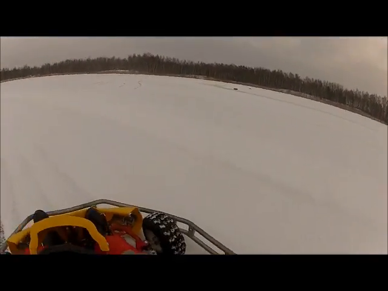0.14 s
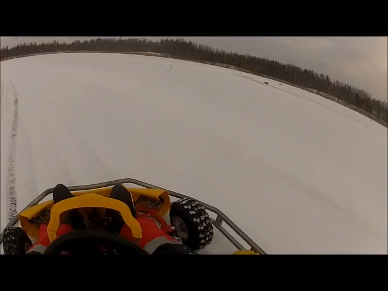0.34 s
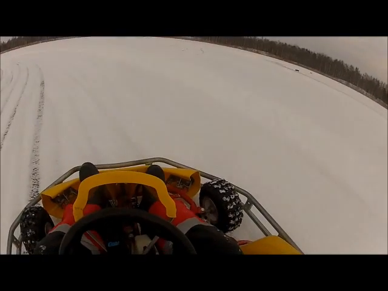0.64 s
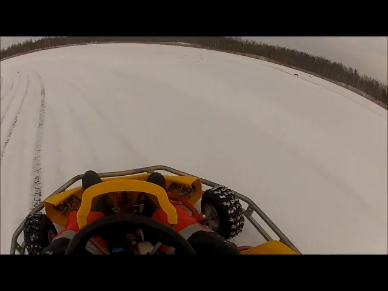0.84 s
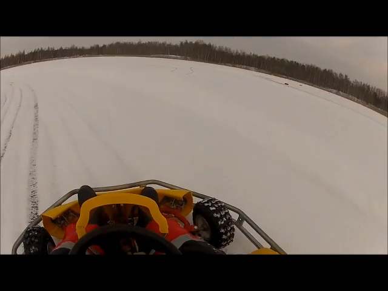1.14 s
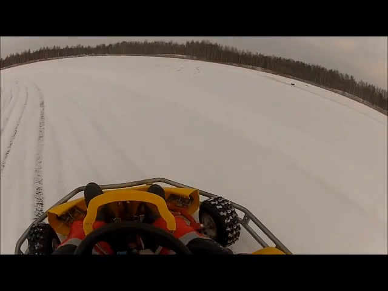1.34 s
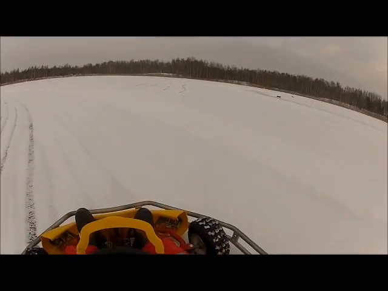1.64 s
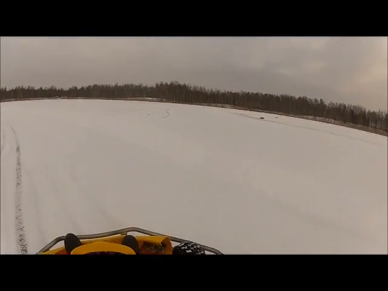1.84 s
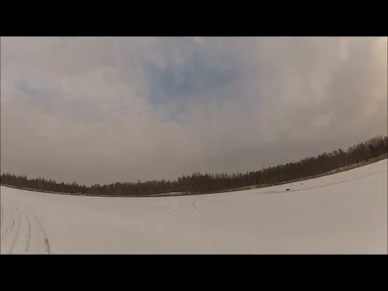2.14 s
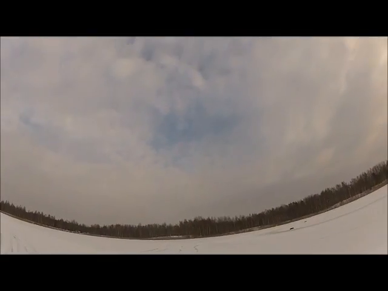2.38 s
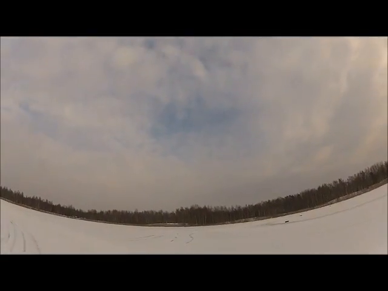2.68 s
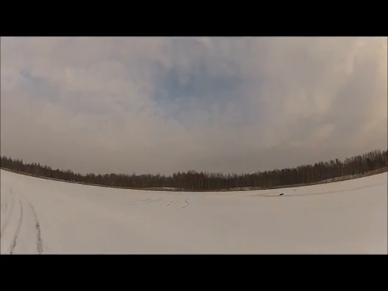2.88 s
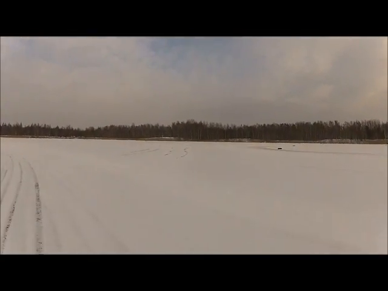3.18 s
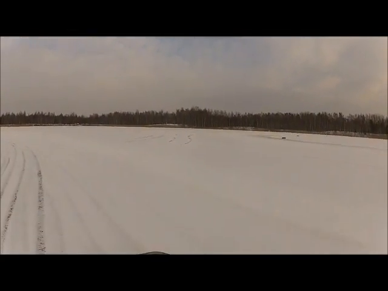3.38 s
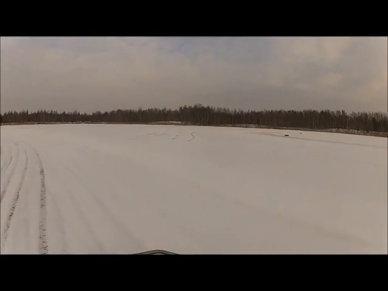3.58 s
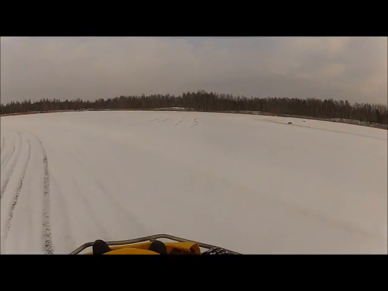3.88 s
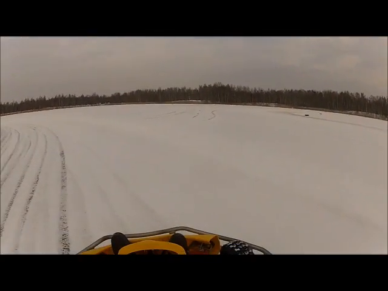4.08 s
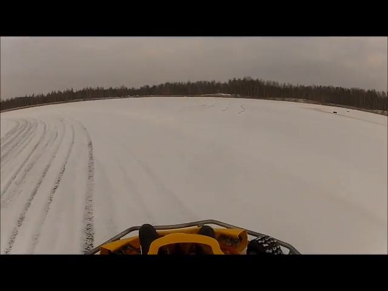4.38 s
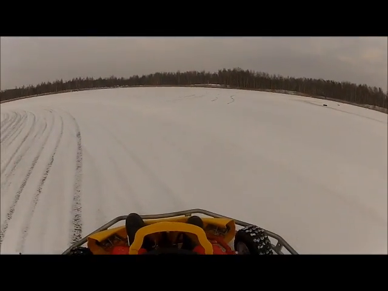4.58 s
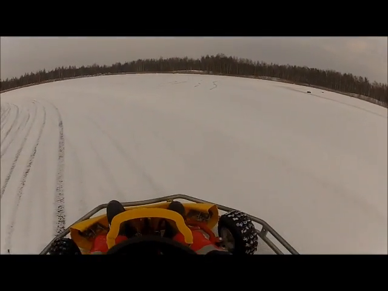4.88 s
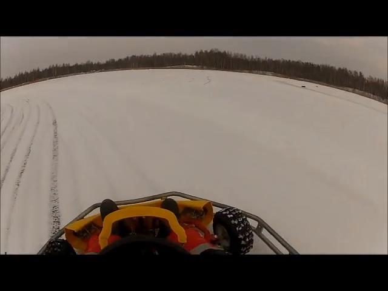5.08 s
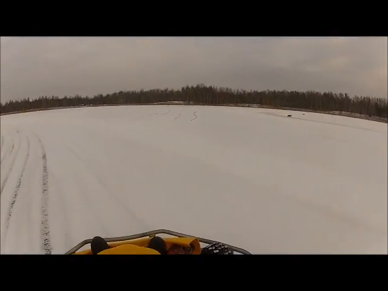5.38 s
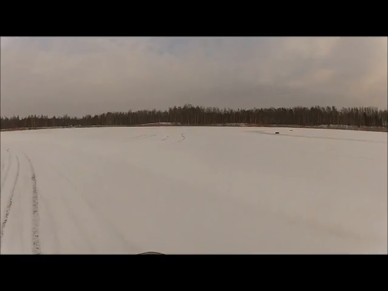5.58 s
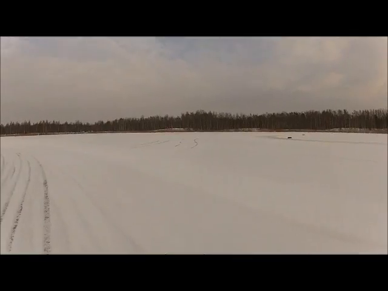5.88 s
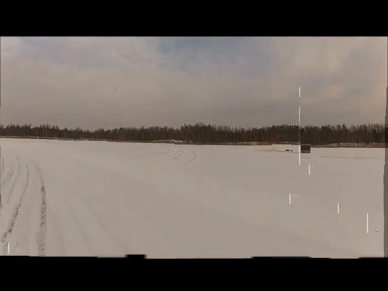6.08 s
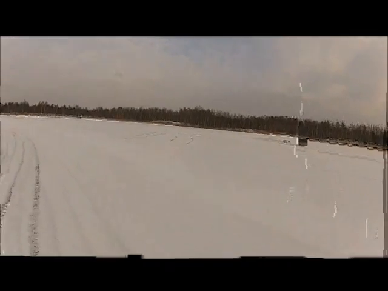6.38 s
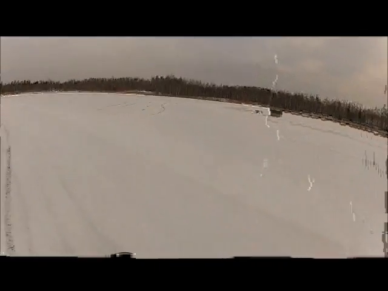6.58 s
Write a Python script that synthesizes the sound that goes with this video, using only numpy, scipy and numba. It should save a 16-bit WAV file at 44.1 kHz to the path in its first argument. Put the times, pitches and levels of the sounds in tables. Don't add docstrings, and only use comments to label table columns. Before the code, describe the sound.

A kart rolls over a frozen lake, played back slowed and muffled. The beginning is nearly still, with murmuring rumble, dull hiss and a few plastic scrapes. After two seconds deep thuds arrive unevenly, with a short slowing chatter of a loose part. From four seconds the blows are strong and crowded, with hard ticks and faint metallic pings, very close to the microphone.

```python
import sys
import numpy as np
from scipy import signal
from scipy.fft import rfft, irfft
from scipy.io import wavfile
from scipy.ndimage import uniform_filter1d
from numba import njit

SR = 44100
rng = np.random.default_rng(int(sys.argv[2]) if len(sys.argv) > 2 else 0)


def generate_wav(signal):
    frames = np.transpose(np.atleast_2d(signal))
    scaled = np.clip(frames, -1, 1) * 32767
    pcm = np.round(scaled).astype(np.int16)
    wavfile.write(sys.argv[1], SR, pcm)


def gain_from_decibels(decibels):
    exponent = np.asarray(decibels, float) / 20
    return 10 ** exponent


N = 296789


def level(x):
    return x / np.sqrt(np.mean(x ** 2))


def resonate(x, modes):
    out = 0
    for k, (hz, width_hz, db) in enumerate(modes):
        b, a = signal.iirpeak(hz, hz / width_hz / 1.5, SR)
        once = signal.lfilter(b, a, x)
        out = out + (-1) ** k * gain_from_decibels(db) * signal.lfilter(b, a, once)
    return out


def walk(rate_hz):
    hold = int(SR / rate_hz)
    steps = np.repeat(rng.standard_normal(400), hold)[:N]
    return 1.3 * uniform_filter1d(uniform_filter1d(steps, hold), hold)


def crackle(rate_hz, spread_db, tail_s):
    size_db = spread_db * np.minimum(rng.exponential(size=N), 2.6)
    grains = (rng.random(N) < rate_hz / SR) * gain_from_decibels(size_db)
    return level(signal.lfilter([1], [1, -np.exp(-1 / (tail_s * SR))], grains))


# frequency in Hz, level in dB per Hz.
MURMUR_COLOUR = [(35, -43.5), (60, 0), (138, -7), (206, -14), (351, -29), (524, -36), (800, -39),
                 (1040, -66)]


def rumble(ruts_db, hiss_db):
    hz = np.fft.rfftfreq(N, 1 / SR)
    points = np.array(MURMUR_COLOUR)
    colour = gain_from_decibels(np.interp(np.log(hz + 1), np.log(points[:, 0]), points[:, 1]))
    murmur = level(irfft(rfft(rng.standard_normal(N)) * colour, N))
    sway = level(resonate(rng.standard_normal(N), [(41, 14, -11.2), (33, 12, -16)]))
    drone = level(resonate(rng.standard_normal(N), [(230, 190, 0), (545, 300, -11.5)]))
    sway_db = -41 + .4 * (ruts_db + 40)
    drone_db = hiss_db - 4
    return (gain_from_decibels(sway_db + 1.5 * walk(8)) * sway
            + gain_from_decibels(ruts_db + 2.5 * walk(20)) * murmur
            + gain_from_decibels(drone_db + 2.2 * walk(18)) * drone)


def hiss(hiss_db):
    grain, fine = crackle(60, 3.0, .005), crackle(500, 3.0, .0015)
    flicker_db = .9 * walk(12)
    bright_db = hiss_db - 12
    low = gain_from_decibels(hiss_db + flicker_db + 1.1 * walk(25)) * (.6 + .12 * grain + .45 * fine)
    high = gain_from_decibels(bright_db + flicker_db + 1.6 * walk(25)) * (.45 + .2 * grain + .45 * fine)
    top = gain_from_decibels(bright_db - 14.5 + flicker_db) * (.5 + .6 * grain)
    return low, high, top


# start in seconds, length in seconds, level in dB,
# brightness in dB.
SCRAPES = [(0.0, .1, -44, -14), (0.45, .28, -39.5, -12), (1.38, .08, -42, -15), (1.73, .12, -37, -10),
           (2.28, .05, -41, -12), (2.352, .035, -40, -9), (3.06, .1, -41, -14), (3.385, .08, -38, -10),
           (3.55, .045, -37, -22), (3.81, .055, -38, -22), (4.035, .06, -37, -10), (4.12, .07, -38, -16),
           (4.565, .05, -37, -8), (4.625, .045, -31, -9), (4.895, .03, -41, -13), (5.29, .08, -41, -13),
           (5.44, .04, -39, -24), (5.655, .06, -45, -16), (5.81, .065, -37, -12), (6.11, .14, -41, -15),
           (6.3, .17, -38, -13), (6.62, .08, -46, -16)]


def scrapes():
    low, high, top, t = np.zeros(N), np.zeros(N), np.zeros(N), np.arange(N) / SR
    grit = .35 + .85 * crackle(260, 2.5, .0025)
    bright_grit = .4 * grit + .6 * grit[::-1]
    for s, length_s, db, bright_db in SCRAPES:
        swell = np.interp(t, [s, s + .25 * length_s, s + 1.3 * length_s], [0, 1, 0])
        burst = gain_from_decibels(db) * swell * grit
        low = np.hypot(low, burst)
        bright_burst = burst * bright_grit
        high = np.hypot(high, bright_burst * gain_from_decibels(bright_db))
        top = np.hypot(top, bright_burst * gain_from_decibels(bright_db - 8))
    return low, high, top


# start in seconds, peak level in dB, brightness in dB.
TICKS = [(0.4828, -27, -15), (0.5367, -25, -16), (0.5495, -23, -15), (0.6065, -27, -17), (1.7674, -23, -15),
         (1.8277, -28, -10), (2.0105, -19, -23), (2.2232, -21, -28), (2.8115, -18, -30), (3.0525, -31, -20),
         (3.1108, -22, -21), (3.4116, -26, -12), (3.757, -29, -16), (3.8033, -32, -28), (4.0148, -27, -11),
         (4.118, -12, -26), (4.2014, -22, -17), (4.2637, -32, -22), (4.5835, -28, -12), (4.7012, -26, -25),
         (4.7391, -23, -29), (4.9387, -22, -23), (5.1735, -24, -23), (5.3765, -12, -22), (5.5009, -26, -24),
         (5.5273, -20, -24), (5.5428, -14, -27), (6.3066, -30, -12), (6.3629, -28, -13), (6.3964, -19, -15)]


def ticks():
    low, high, t = np.zeros(N), np.zeros(N), np.arange(N) / SR
    for s, db, bright_db in TICKS:
        age = np.clip(t - s, 0, None)
        burst = (1 - np.exp(-age / .0004)) * gain_from_decibels(db - 60 * age / .045)
        low = np.hypot(low, burst * gain_from_decibels(-3.5))
        high = np.hypot(high, burst * gain_from_decibels(bright_db + 1.5))
    return low, high


# frequency in Hz, width in Hz, level in dB.
HOUSING_LOW = [(945, 190, -7), (1140, 70, 0), (1300, 160, 0.5), (1750, 180, -2.5), (2050, 200, -9.5),
               (2350, 300, -13.5)]
# frequency in Hz, width in Hz, level in dB.
HOUSING_HIGH = [(2800, 300, -2.5), (3200, 250, -7), (3560, 300, 0.4), (4250, 400, -13.5), (5000, 500, -14)]
# frequency in Hz, width in Hz, level in dB.
HOUSING_TOP = [(4250, 450, 0), (5100, 900, -2)]


def rattle(hiss_db):
    hiss_low, hiss_high, hiss_top = hiss(hiss_db)
    scrape_low, scrape_high, scrape_top = scrapes()
    tick_low, tick_high = ticks()
    low = np.hypot(np.hypot(tick_low, scrape_low), hiss_low)
    high = np.hypot(np.hypot(tick_high, scrape_high), hiss_high)
    top = np.hypot(scrape_top, hiss_top)

    noise, dust = rng.standard_normal((2, N))
    snap = np.zeros(N)
    snap[[int(s * SR) + 30 for s, db, bright_db in TICKS]] = gain_from_decibels(13)
    noise = noise + snap

    out = 0
    for loudness, source, modes in ((low, noise, HOUSING_LOW), (high, noise, HOUSING_HIGH),
                                    (top, dust, HOUSING_TOP)):
        out = out + resonate(loudness * source, modes) / np.std(resonate(source, modes))
    return out


# frequency in Hz, width in Hz, level in dB.
CHATTER_RING = [(3220, 170, 0), (4250, 200, -4)]


def chatter():
    t, taps = np.arange(N) / SR, np.arange(9)
    gaps_s = .0665 * 1.035 ** taps
    starts = 2.294 + np.cumsum(gaps_s) - gaps_s
    taps_db = -45 - 1.0 * taps + 2.5 * np.cos(2.1 * taps - 2.1)
    loudness = 0
    for s, db in zip(starts, taps_db):
        loudness = loudness + (t > s) * gain_from_decibels(db - 60 * np.abs(t - s) / .11)
    noise = rng.standard_normal(N)
    return resonate(loudness * noise, CHATTER_RING) / np.std(resonate(noise, CHATTER_RING))


# start in seconds, mount ring in dB, sway in dB, knock in dB, shell in dB.
KNOCKS = [(0.607, -38, -35, -37, -42), (1.767, -32, -36, -33, -36), (2.014, -29, -33, -25, -23),
          (2.244, -29, -30, -38, -33), (3.058, -17, -30, -20, -37), (3.115, -15, -40, -29, -24),
          (3.808, -29, -30, -32, -31), (3.851, -20, -21, -31, -32), (3.997, -25, -27, -24, -37),
          (4.12, -8, -45, -13, -25), (4.161, -15, -36, -42, -30), (4.425, -29, -36, -40, -50),
          (4.584, -33, -30, -34, -34), (4.624, -14, -24, -32, -29), (4.939, -12, -15, -12, -23),
          (5.201, -10, -17, -16, -23), (5.365, -12, -27, -21, -28), (5.499, -2, -10, -25, -28),
          (5.544, -9, -17, -25, -20), (5.675, -29, -50, -31, -38), (5.771, -10, -25, -30, -37),
          (6.408, -14, -18, -26, -44), (6.463, -19, -24, -35, -38), (6.543, -26, -13, -34, -37)]
# start in seconds, mount ring in dB, sway in dB.
BUMPS = [(1.829, -31, -26), (2.181, -18, -38), (2.21, -21, -28), (2.273, -23, -36), (2.361, -24, -28),
         (2.45, -15, -20), (2.499, -13, -24), (2.556, -27, -29), (2.822, -23, -27), (2.865, -13, -17),
         (3.163, -17, -36), (3.273, -28, -42), (3.373, -28, -31), (3.582, -16, -28), (3.76, -29, -27),
         (4.263, -26, -43), (4.669, -17, -18), (4.748, -4, -17), (4.848, -15, -33), (4.89, -13, -20),
         (5.145, -22, -13), (5.328, -26, -28), (5.853, -9, -24), (5.959, -22, -28), (6.041, -9, -18),
         (6.073, -14, -19), (6.143, -12, -21), (6.199, -17, -21), (6.576, -8, -18), (6.7, -30, -22)]
# start in seconds, knock in dB, shell in dB.
TAPS = [(0.448, -46, -34), (0.485, -30, -44), (0.521, -45, -29), (0.549, -42, -37), (1.421, -40, -43),
        (2.361, -38, -40), (3.344, -36, -48), (3.375, -35, -40), (3.76, -31, -42), (3.97, -34, -45),
        (4.022, -27, -32), (4.204, -34, -36), (4.263, -39, -41), (5.15, -29, -41), (5.91, -33, -40),
        (5.959, -34, -43), (6.199, -36, -40), (6.34, -30, -55)]
# start in seconds, level in dB.
CLIP_HITS = [(0.521, -48), (2.014, -45), (2.273, -48), (3.344, -51), (3.82, -47), (3.98, -50), (4.12, -37),
             (4.204, -37), (4.43, -54), (4.6, -44), (4.748, -45), (4.939, -46), (5.172, -36), (5.365, -33),
             (5.499, -49), (6.041, -50), (6.143, -48), (6.339, -51), (6.463, -48)]


def jolts():
    soft = [(s, ring_db, sway_db, ring_db - 21, ring_db - 30) for s, ring_db, sway_db in BUMPS]
    rows = np.array(sorted(list(KNOCKS) + soft))
    mount, sway, knock, shell = (rows[:, [0, k]].tolist() for k in range(1, 5))
    knock = sorted(knock + [[s, knock_db] for s, knock_db, shell_db in TAPS])
    shell = sorted(shell + [[s, shell_db] for s, knock_db, shell_db in TAPS])
    return [None, mount, sway, knock, shell, CLIP_HITS]


@njit
def ring(push, pole):
    z, out = 0j, np.empty(len(push))
    for i in range(len(push)):
        z = z * pole[i] + push[i]
        out[i] = z.imag
    return out


# frequency in Hz, time to fade by 60 dB in seconds, push length in cycles,
# level in dB, number of its list in jolts(), pitch scatter as a share from 0 to 1.
MOUNT = [
    (84, .22, 1.35, 5.9, 1, .04),
    (41, .45, 1.6, 3.2, 2, .05),
    (165, .1, 1.4, 10.6, 3, .07),
    (274, .13, 1.6, 4.5, 4, .02),
    (346, .19, 1.6, -2.5, 4, .01),
    (533, .33, 4.0, 5.5, 5, .005),
]


def thumps():
    out, hits = 0, jolts()
    detune = rng.standard_normal((len(hits[3]), len(MOUNT)))
    for m, (hz, t60_s, cycles, db, column, scatter) in enumerate(MOUNT):
        push, keep, pitch = np.zeros(N, complex), np.ones(N), np.full(N, 1. * hz)
        shape = np.hanning(int(cycles * SR / hz))
        shape /= shape.sum()
        shape_t = (np.arange(len(shape)) - len(shape) / 2) / SR
        for (s, size_db), d in zip(hits[int(column)], detune[:, m]):
            new_hz = hz * (1 + scatter * d)
            start = int(s * SR) - len(shape) // 2
            span = slice(start, start + len(shape))
            swing = np.exp(2j * np.pi * new_hz * shape_t)
            push[span] -= 1.4 * gain_from_decibels(size_db + db) * shape * swing
            keep[span] *= np.exp(-2.5 * shape)
            pitch[start:] = new_hz
        fade = np.log(1000) / (t60_s * SR)
        out = out + ring(push, keep * np.exp(2j * np.pi * pitch / SR - fade))
    return out


# time in seconds, ruts in dB, stud and engine hiss in dB.
RIDE = [(0.1, -45, -46.5), (0.6, -46, -45), (1.05, -52, -49), (1.6, -49, -49), (2.0, -44, -47),
        (2.4, -41, -46), (2.85, -43, -50), (3.3, -39, -45.5), (3.9, -36, -48.5), (4.2, -34, -45),
        (4.48, -41, -48), (4.75, -34, -44), (5.1, -42, -45.5), (5.35, -33, -44), (5.68, -42, -47),
        (6.1, -35, -46), (6.42, -34, -45), (6.73, -41, -48)]


def scene():
    s, *columns = np.transpose(RIDE)
    ruts_db, hiss_db = (np.interp(np.arange(N) / SR, s, c) for c in columns)
    mix = rumble(ruts_db, hiss_db) + rattle(hiss_db) + chatter() + thumps()
    return mix[None]


def top_cut(x):
    return signal.sosfilt(signal.butter(12, 15960, fs=SR, output="sos"), x)


def record(dry):
    held_hz = 12000
    noisy = dry + gain_from_decibels(-70) * rng.standard_normal(dry.shape)
    slow = signal.resample_poly(noisy, held_hz, SR, axis=1)
    held = np.repeat(slow, 4, axis=1)
    out = signal.resample_poly(held, SR, 4 * held_hz, axis=1)[:, :N]
    out = signal.sosfiltfilt(signal.ellip(8, .2, 40, 15380, fs=SR, output="sos"), out)
    out = signal.sosfilt(signal.butter(2, 25, "high", fs=SR, output="sos"), out)
    return top_cut(out)


dry = scene()
out = record(dry)
generate_wav(out)
```